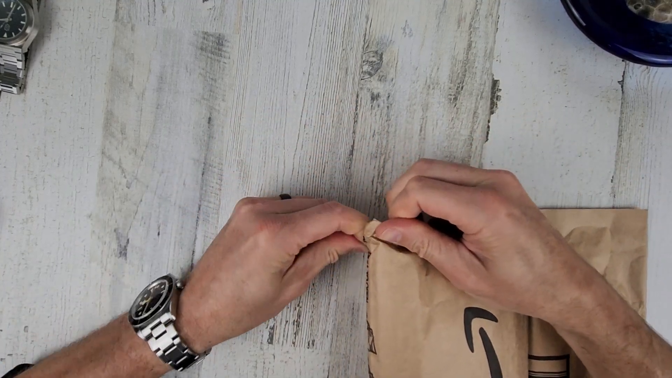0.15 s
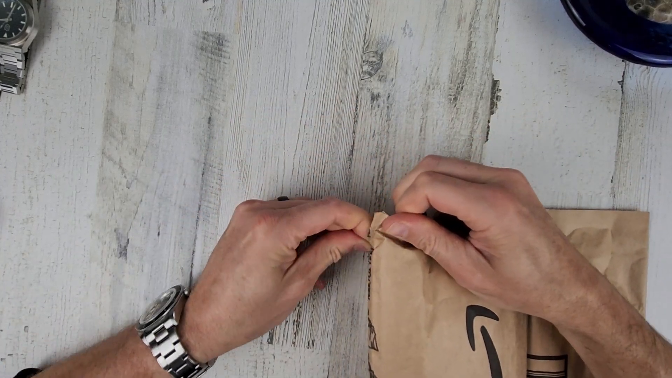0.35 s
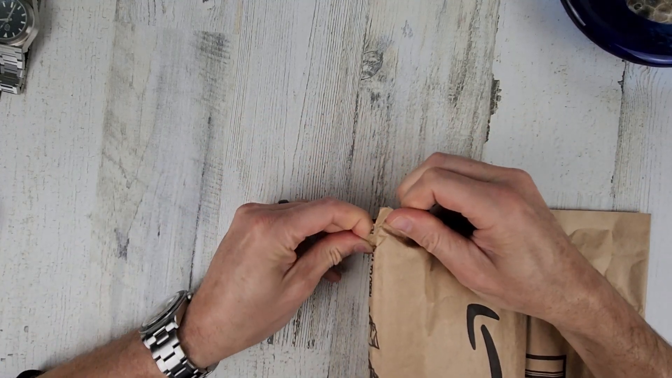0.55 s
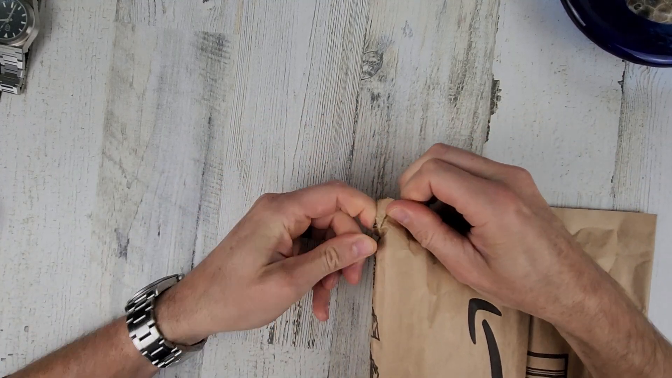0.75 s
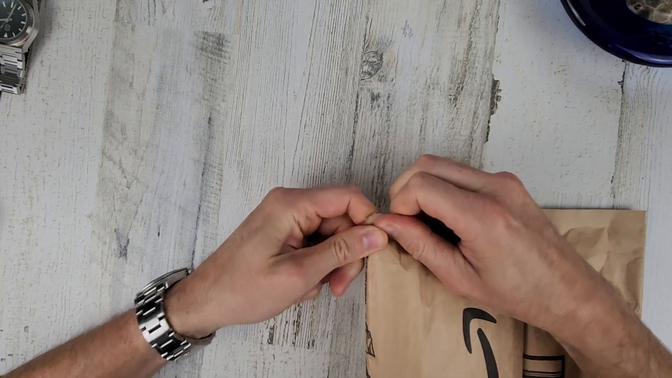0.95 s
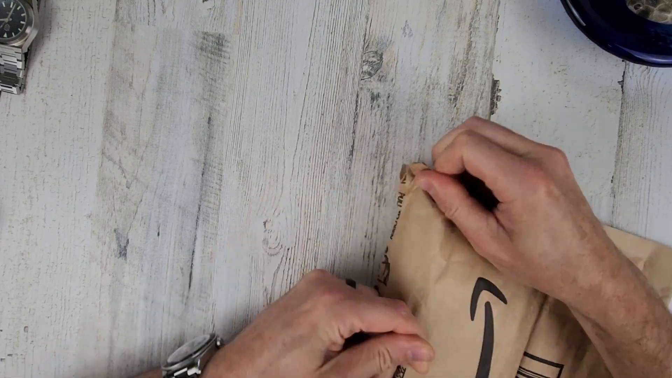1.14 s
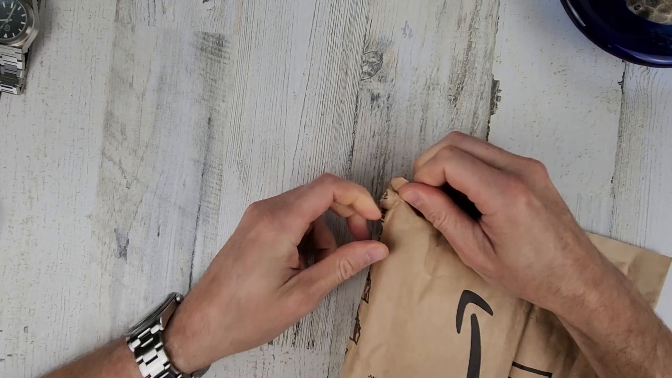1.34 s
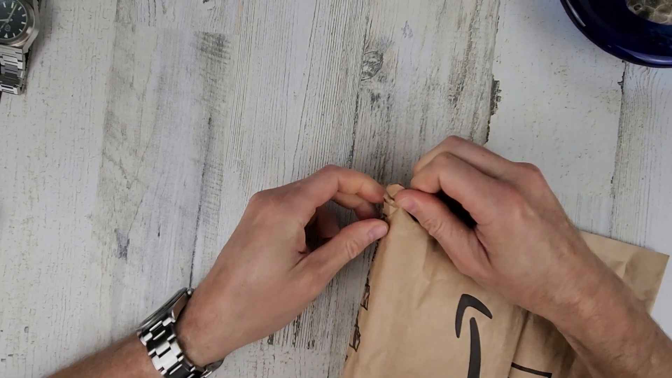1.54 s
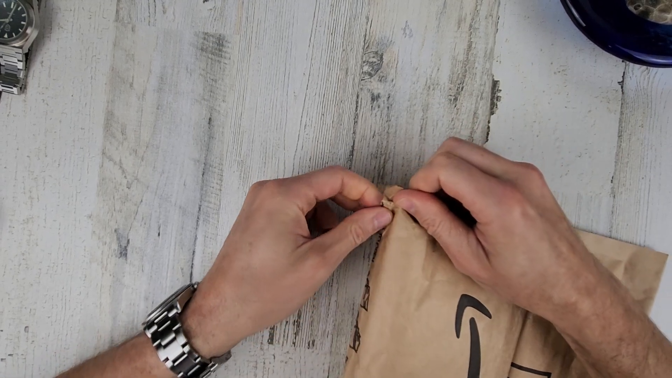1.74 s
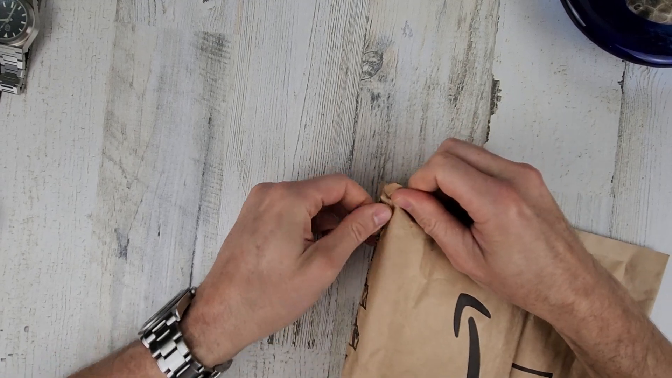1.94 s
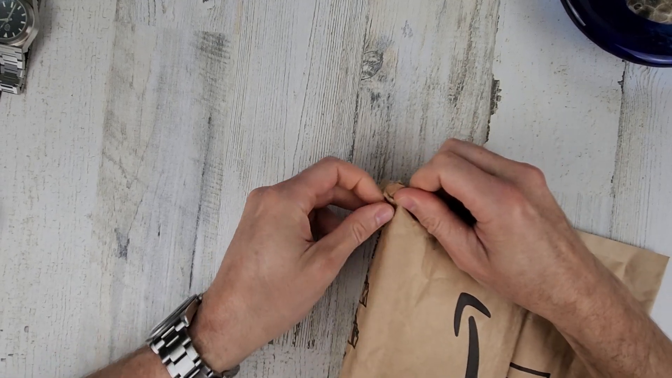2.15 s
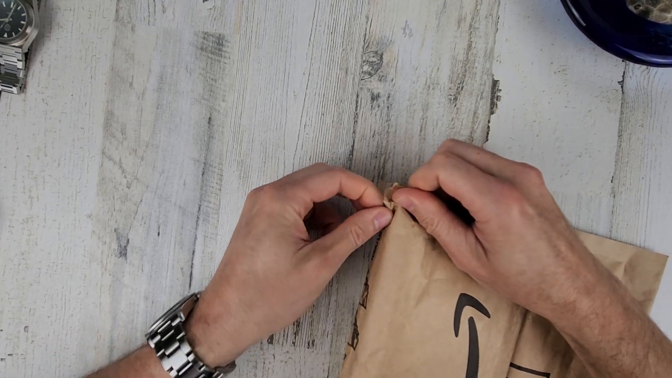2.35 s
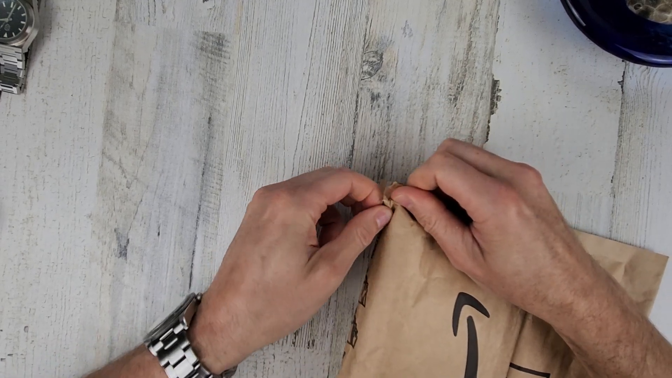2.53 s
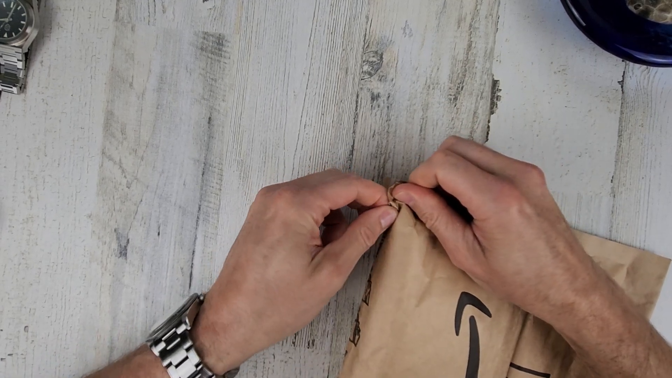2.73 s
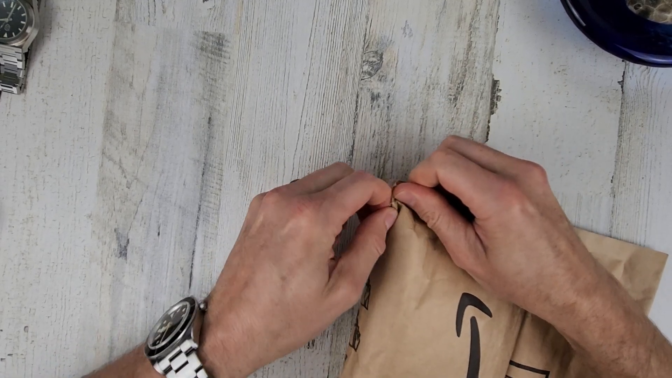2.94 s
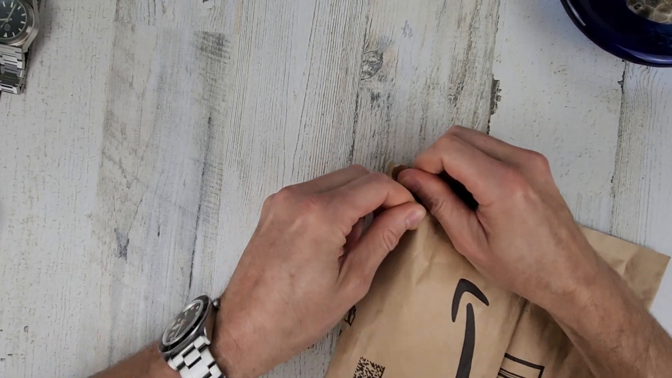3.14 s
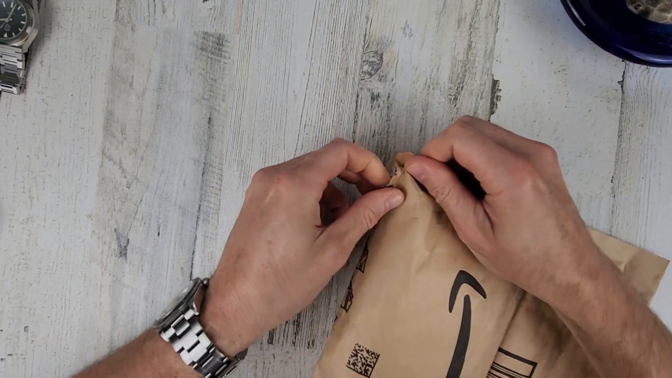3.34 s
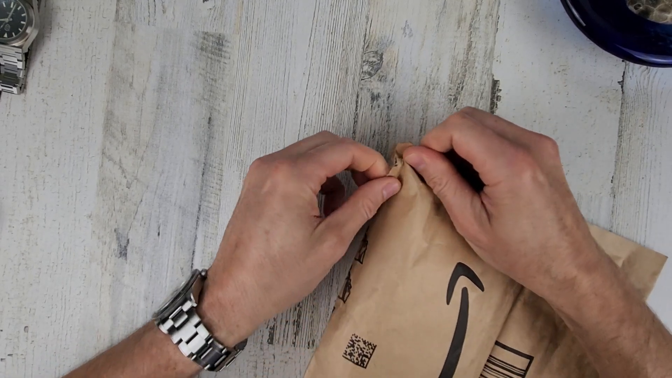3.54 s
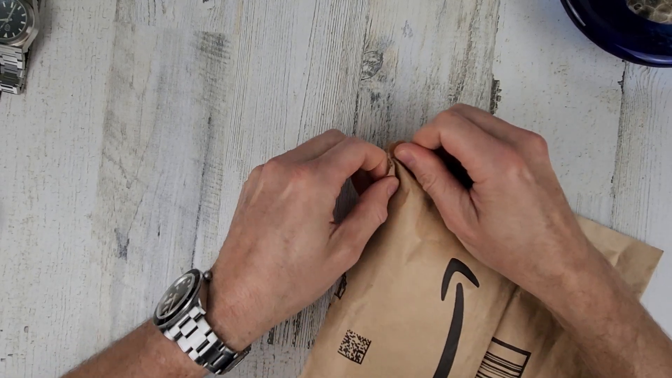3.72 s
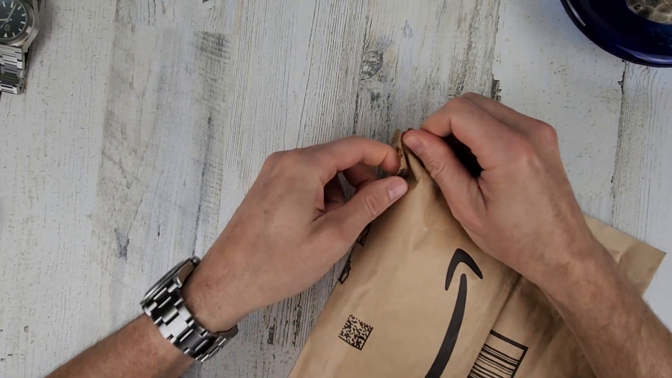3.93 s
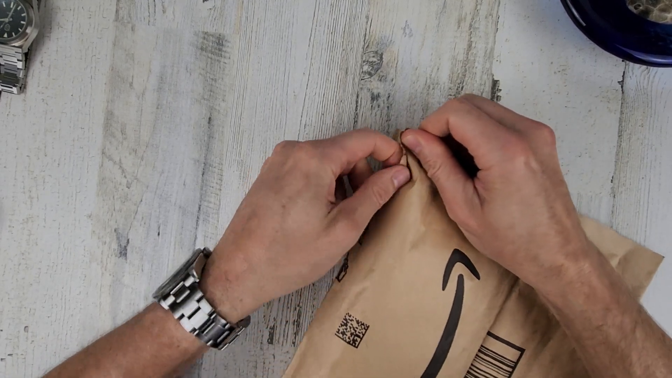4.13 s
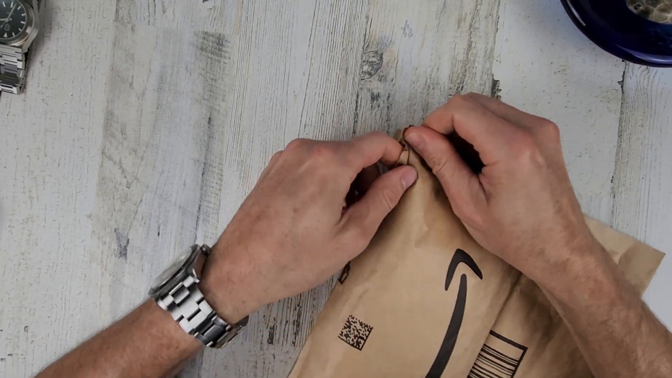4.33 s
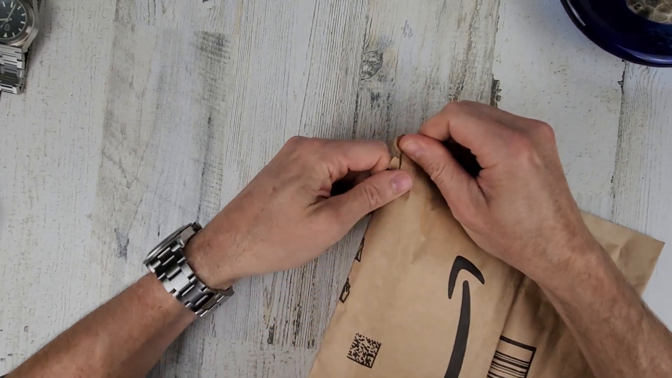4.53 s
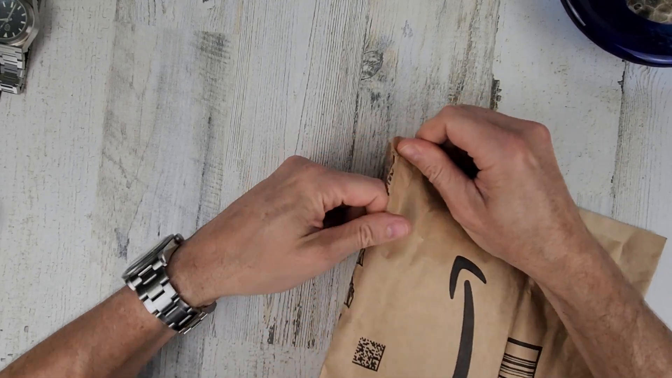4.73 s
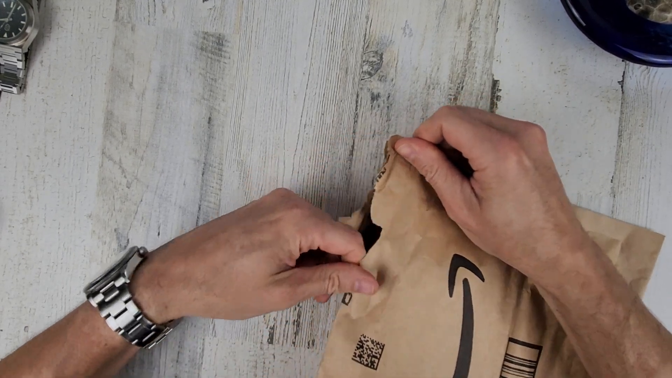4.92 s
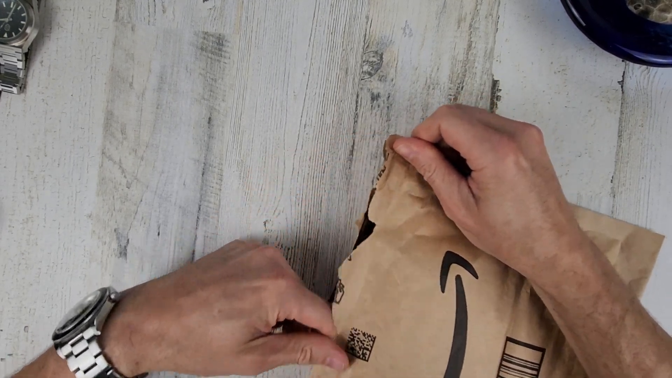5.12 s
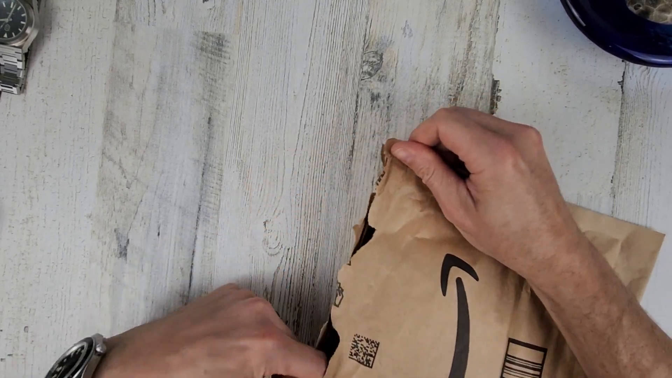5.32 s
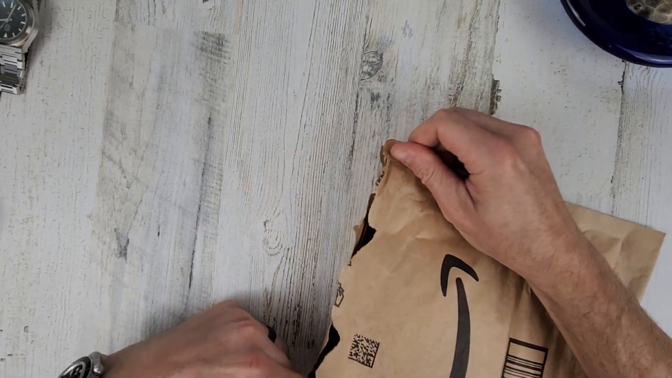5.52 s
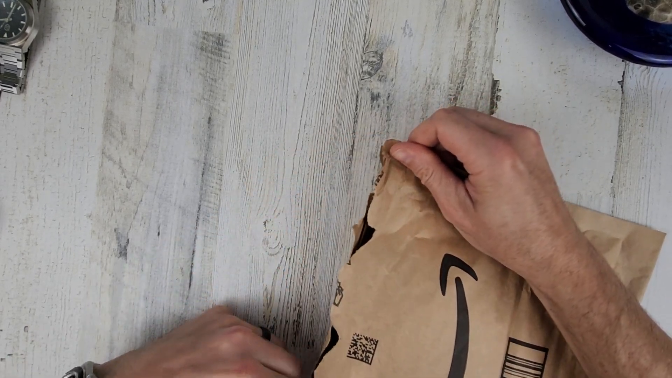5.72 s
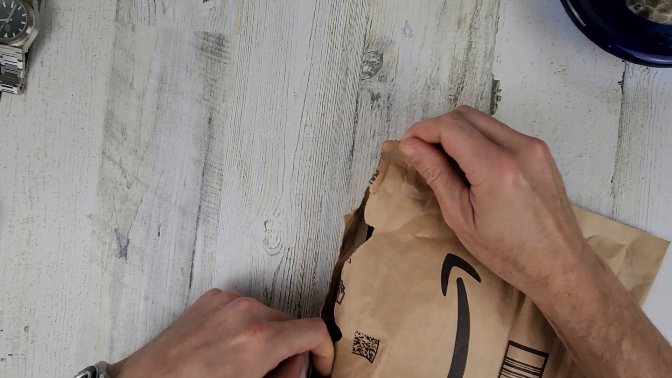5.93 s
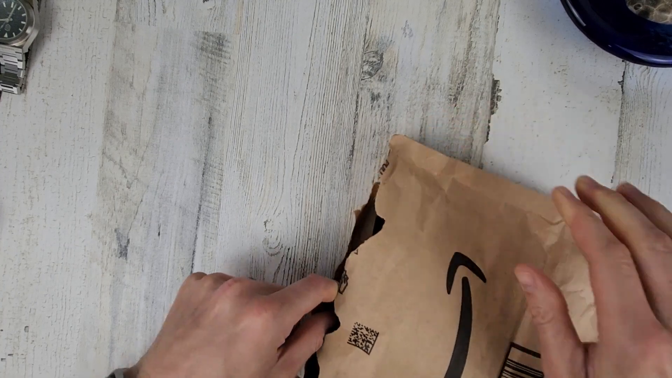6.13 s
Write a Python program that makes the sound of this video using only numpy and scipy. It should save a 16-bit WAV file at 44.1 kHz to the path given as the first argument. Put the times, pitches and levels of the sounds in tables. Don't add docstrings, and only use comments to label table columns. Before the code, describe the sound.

Close stereo microphone about half a metre above a table, with a small dry room and faint air hiss. Paper fibres whisper and crease softly, then a short, loud crackling tear breaks out. Isolated snaps and slow, creaky pulls fill the middle. A sharp crack at four and a half seconds leads into busy tearing, strip flicks and dull table knocks that thin towards the end.

```python
import sys
import numpy as np
from scipy import signal
from scipy.fft import rfft, irfft, next_fast_len
from scipy.io import wavfile
from scipy.ndimage import uniform_filter1d

SR = 44100
rng = np.random.default_rng(int(sys.argv[2]) if len(sys.argv) > 2 else 0)


def invert_db(level):
    return 10 ** (np.asarray(level, dtype=float) / 20)


def dump_mix(stems):
    frames = np.atleast_2d(stems).T
    limited = np.clip(frames, -1, 1)
    pcm = np.round(limited * 32767).astype(np.int16)
    wavfile.write(sys.argv[1], SR, pcm)


N = 272097

# pitch_hz, density_db (per Hz)
SHEET_COLOUR = [(88, -40), (170, -28), (310, -13), (438, -12), (485, -18.5), (579, -4.5), (690, -8.5),
                (1120, -3), (1370, -5.5), (2200, -6), (5000, -14), (6500, -25.5), (11000, -120)]
# pitch_hz, density_db (per Hz)
FIBRE_COLOUR = [(2060, -17), (3500, -5), (4210, -7), (5000, -2), (6300, -4.5), (7860, -3), (8900, -7),
                (10000, -9), (11200, -7.5), (12300, -4.5), (15800, -8), (16800, -9.5)]
# pitch_hz, density_db (per Hz)
TABLE_COLOUR = [(12, -50), (20, -26), (43, 1.5), (81, -2), (103, -8.5), (135, -8), (220, -14), (290, -31),
                (480, -120)]
# pitch_hz, density_db (per Hz)
ROOM_COLOUR = [(12, -27), (20, -7.5), (299, -14), (432, -18), (1190, -8.5), (1770, -14), (2410, -10),
               (2940, -29), (8570, -20), (10000, -26), (12500, -23), (15800, -27)]
# pitch_hz, likeness (0 to 1)
LIKENESS = [(40, 0.97), (130, 0.93), (300, 0.8), (700, 0.95), (1400, 0.72), (3000, 0.38), (7000, 0.11),
            (15000, 0)]
# pitch_hz, left_minus_right_db
PORT_DIFFERENCE = [(60, -1.5), (400, 2), (1300, 1.3), (3000, 0.4), (8000, -0.3), (14000, -3.5)]
# time_s, level_db
RUMBLE = [
    (0.0, -67.5),
    (0.86, -66.5),
    (1.18, -57.5),
    (2.3, -75.5),
    (4.31, -76.5),
    (5.1, -49.5),
    (5.41, -56),
    (5.6, -64),
    (6.17, -65),
]
# start_s, peak_db, pitch_hz, fade_ms
TABLE_KNOCKS = [(1.063, -30.5, 96, 43), (1.138, -35, 67.6, 39), (1.945, -53.5, 77, 98),
                (3.015, -33.5, 106, 15), (3.09, -47.5, 70.0, 22), (3.632, -55, 84.6, 23),
                (4.529, -42, 62.4, 20), (4.601, -42, 57.6, 53), (4.837, -48, 98, 25),
                (5.109, -35.5, 93, 27), (5.258, -38.5, 114, 17), (5.368, -41, 86.5, 35),
                (5.588, -43, 118, 15), (5.782, -52.5, 124, 22), (5.909, -48.5, 53.8, 44),
                (6.027, -38.5, 103, 16)]
# start_s, peak_db, pitch_hz, sharpness_db
LARGE_FOLDS = [(1.121, -15, 676, -7), (1.138, -1.5, 920, -8.5), (1.185, -11.5, 890, -20),
               (1.242, -7, 675, -4), (1.447, -13, 700, -31), (1.448, -14.5, 1257, -23.5),
               (1.963, -8.5, 580, -16), (2.017, -13.5, 1090, -15.5), (2.046, -16.5, 930, -20),
               (2.087, -17, 934, -28), (3.086, -15, 1060, -15.5), (3.091, -17, 900, -20),
               (3.34, -11.5, 1220, -9.5), (3.639, -6, 1000, -16), (4.389, -19, 1610, -12.5),
               (4.4265, -2, 1480, -5), (4.556, -18, 1030, -7.5), (4.587, -13.5, 930, -9),
               (4.602, -13, 890, -4), (4.62, -12, 1000, -6), (4.639, -22, 1150, -11.5),
               (4.674, -14.5, 1300, -21), (4.933, -16, 1160, -18), (5.053, -15, 920, -14),
               (5.103, -6, 1050, -12), (5.124, -3.5, 1060, -19), (5.136, -13, 1050, -22),
               (5.153, -8, 880, -24), (5.259, -17.5, 1260, 2.5), (5.3245, -3.5, 1040, -5.5),
               (5.362, -3, 1106, -26), (5.464, -13, 1140, -11), (5.6345, -15, 1550, -18),
               (5.966, -13.5, 1254, -12)]
# start_s, peak_db, pitch_hz
SMALL_CREASES = [(0.275, -29, 1220), (0.29, -26.5, 1240), (0.504, -37, 445), (0.529, -29.5, 1360),
                 (0.645, -28, 1090), (0.665, -23, 1330), (0.701, -31, 1640), (1.082, -20, 1030),
                 (1.22, -17.5, 1420), (1.368, -28.5, 1100), (1.918, -37, 1160), (2.568, -31.5, 1230),
                 (2.637, -29.5, 1280), (3.016, -22, 573), (3.058, -32, 740), (3.264, -25, 1030),
                 (3.752, -41, 820), (3.816, -34.5, 760), (3.846, -31.5, 1030), (3.959, -27, 1053),
                 (4.186, -21.5, 900), (4.516, -22, 1000), (4.874, -18, 1030), (5.016, -29, 1540),
                 (5.223, -19, 1190), (5.507, -21, 1120), (5.532, -19.5, 1090), (5.594, -24, 1150),
                 (5.608, -18.5, 1060), (5.896, -15.5, 1185), (4.772, -27, 1500), (4.638, -20, 1000),
                 (1.954, -26, 1400), (2.022, -22, 2000), (2.03, -30, 1500), (0.655, -32, 2000),
                 (3.655, -30, 1300), (1.06, -20, 600), (1.13, -17, 760), (3.097, -24, 1300),
                 (3.124, -30, 1700), (4.851, -15, 1500), (4.952, -20, 1300), (5.018, -19, 895),
                 (5.062, -23, 1000), (5.166, -19, 1010), (5.404, -27, 1500), (5.44, -21, 1000),
                 (5.484, -25, 1200)]
# start_s, peak_db
STRIP_FLICKS = [(0.79, -21.5), (0.958, -25.5), (1.15, -8.5), (1.396, -30), (2.101, -14), (2.998, -25),
                (3.006, -26), (4.323, -29), (4.663, -22), (4.772, -29), (4.789, -19.5), (4.807, -19.5),
                (4.84, -10), (4.891, -12.5), (4.908, -8.5), (4.973, -9), (4.998, -11), (5.331, -33),
                (5.786, -18.5), (4.8745, -16), (4.986, -15), (5.012, -16), (5.938, -17), (6.019, -8.5),
                (5.951, -14.5), (1.242, -13), (1.129, -14), (4.8, -33)]
# start_s, hiss_db, sheet_over_hiss_db, fall_ms
RIPS = [(0.49, -52.5, -8, 43), (0.558, -40.5, -7, 22), (1.066, -18.5, -3, 6), (1.084, -25.5, 0, 22.5),
        (1.609, -51, 2.5, 70), (1.671, -47, 4.5, 19), (2.641, -45.5, 0, 18), (3.346, -48.5, 7.5, 41),
        (3.643, -45.5, 6, 38.5), (4.522, -30, -2.5, 12), (4.652, -29, 3, 30), (4.842, -21, 5, 23.6),
        (4.868, -26.5, 1, 70), (4.914, -23.5, -0.5, 24), (5.105, -24, 3, 51), (5.127, -22, 4, 14),
        (5.22, -37, -1, 25), (5.242, -29.5, -0.5, 44), (5.288, -31, -1.5, 27), (5.366, -22.5, -1, 20.6),
        (5.466, -27.5, -5, 32.5), (5.633, -33, 1, 18.7), (6.017, -28, 1, 24.3)]
# release_s, hiss_db, sheet_over_hiss_db, rise_ms
SLOW_PULLS = [(0.031, -53, -7.5, 34), (0.626, -55.5, 3.5, 21), (0.985, -42.5, 1, 67), (1.148, -30, 3.5, 36),
              (1.377, -57.5, 8.5, 120), (1.488, -44, 7, 27), (1.808, -52.5, 2, 46), (1.979, -36, 0.5, 39),
              (2.003, -51.5, 5.5, 95), (2.103, -37, 3, 71), (2.332, -48.5, -1, 44), (2.615, -48, 3, 52),
              (2.692, -58, -6, 33), (2.972, -49, -1, 36), (3.026, -30.5, -1.5, 24), (3.121, -41, 4, 100),
              (3.242, -44.5, -6, 107), (3.908, -53, 3.5, 50), (4.194, -35.5, -3.5, 42),
              (4.221, -54.5, 5, 120), (4.285, -46, 0, 92), (4.361, -48, 2.5, 46), (4.976, -23.5, 1, 25),
              (5.02, -23.5, 2, 58), (5.167, -28, 0.5, 58), (5.452, -29.5, -2, 33.6),
              (5.607, -32, 2.5, 27.4), (5.914, -39, 3.5, 82)]
# peak_s, hiss_db, sheet_over_hiss_db, fall_ms
FINGER_RUBS = [(0.066, -57.5, 0.5, 53), (0.173, -49, 0, 56), (0.282, -50.5, -1, 53), (0.419, -52, -8.5, 73),
               (0.68, -49.5, 3.5, 83), (0.766, -52, -2, 22), (0.796, -44, 4.5, 18), (0.851, -48, 0, 115),
               (1.045, -39.5, -4, 55), (1.178, -33.5, 4.5, 37), (1.24, -41.5, -1.5, 100),
               (1.533, -55, 3, 47), (1.586, -47.5, -6.5, 44), (1.912, -52, 0, 26), (2.16, -44.5, -0.5, 59),
               (2.377, -57.5, 2.5, 50), (2.48, -61.5, 2.5, 69), (2.757, -57.5, 3, 37),
               (3.281, -48.5, 1.5, 138), (3.519, -64.5, 10.5, 32), (3.613, -61.5, 10.5, 32),
               (3.795, -51.5, 3.5, 118), (4.054, -46, -2, 58), (4.408, -36.5, 2.5, 53),
               (4.547, -39.5, 2.5, 77), (4.616, -19, 1, 26), (4.783, -45.5, 8.5, 100),
               (5.068, -35.5, 0, 31), (5.557, -44, -3, 115), (5.96, -38, 2.5, 90), (6.12, -55.5, -13, 66)]
# start_s, hiss_db, sheet_over_hiss_db, fall_ms
GLUE_SPOTS = [(0.531, -37, -2, 19.5), (1.0615, -21, 0, 6.8), (1.2432, -26, -4.5, 13), (2.837, -56, -14, 18),
              (2.871, -52.5, -3, 50), (4.325, -36, -6, 6), (4.4285, -27, 2, 10.4), (5.327, -28, 0.5, 24),
              (5.788, -36.5, 1, 21), (5.511, -36, 3, 7), (1.451, -52, 14, 9.8), (3.751, -55, 4, 40),
              (4.959, -30, 0, 12), (5.123, -30, 0, 10), (3.342, -36, 6, 9), (3.64, -36, 6, 11),
              (5.3315, -27, 0, 3), (6.018, -28, 0, 8), (5.556, -39, -8, 12), (3.366, -48, -3, 6),
              (4.407, -36, -2, 5), (1.369, -48.5, 5, 8), (4.557, -36, 0, 5), (5.233, -36, -2, 8),
              (0.791, -43, -2, 8)]
# start_s, end_s, pitch_hz, level_over_sheet_db
TAUT_PANELS = [
    (4.824, 5.034, 2200, -4),
    (5.122, 5.18, 940, 0),
    (5.416, 5.497, 1086, -1),
    (5.85, 5.93, 1143, 0.5),
    (2.13, 2.8, 1255, -3),
    (3.38, 3.696, 1110, -3.5),
    (4.58, 4.676, 894, -5),
]
# start_s, peak_db, pitch_hz
THREADS = [(0.401, -42, 5160), (0.4888, -40, 8870), (0.5295, -24, 7870), (0.7901, -23, 4690),
           (1.0615, -9, 5040), (1.1388, -10, 3560), (1.1514, -19, 2550), (1.2428, -8.5, 2700),
           (1.5673, -41, 6480), (1.6651, -38, 5430), (1.9624, -16, 5000), (2.0214, -27, 3240),
           (2.1022, -19, 3170), (2.5864, -39, 3010), (2.637, -31, 6590), (2.8345, -50, 7490),
           (2.8698, -34, 7500), (2.9612, -39, 4940), (3, -24, 4390), (3.0155, -21, 7800),
           (3.3413, -16.5, 3350), (3.6386, -20, 3790), (4.0587, -29, 5370), (4.1699, -25, 6360),
           (4.3231, -26, 4680), (4.4074, -25, 3410), (4.4276, -6.5, 5260), (4.5184, -20, 5050),
           (4.5565, -22, 6940), (4.6033, -8, 2860), (4.8393, -9, 2790), (4.8743, -17, 2540),
           (4.9067, -13, 6410), (4.9596, -14, 4720), (4.9926, -11, 3000), (5.1013, -15, 2630),
           (5.114, -9, 6350), (5.124, -8, 3820), (5.2324, -21, 3330), (5.24, -20, 2950),
           (5.2594, -18.5, 5110), (5.2947, -26, 2530), (5.3258, -6, 7740), (5.3632, -9, 7720),
           (5.4301, -22, 5220), (5.464, -16, 7340), (5.5563, -31, 7330), (5.5837, -27, 3080),
           (5.5957, -21, 3290), (5.6356, -18, 5390), (5.7871, -24.5, 3240), (6.018, -12, 2840)]
# start_s, end_s, pitch_hz, level_over_hiss_db
RINGING_EDGES = [(1.06, 1.077, 3300, -3), (1.243, 1.262, 2750, -1), (1.463, 1.495, 5300, -3),
                 (2.04, 2.115, 7600, -4), (3.005, 3.037, 7800, -3.5), (3.09, 3.249, 5040, -6),
                 (3.09, 3.15, 7900, -5), (3.2, 3.275, 12500, -3.5), (4.15, 4.308, 5470, -4),
                 (4.59, 4.683, 13000, -6), (4.904, 4.929, 6360, -4.5), (4.958, 5.03, 4730, -4.5),
                 (5.119, 5.14, 4000, -2), (5.09, 5.19, 13000, -4), (5.23, 5.312, 13000, -4.5),
                 (5.326, 5.345, 8000, -1), (5.361, 5.391, 7760, -3.5), (5.431, 5.487, 7900, -5.5),
                 (5.552, 5.645, 14500, -2), (5.852, 6.044, 4200, -6.5)]
# time_s, treble_db
EDGE_FACING = [(0.0, 0), (0.6, 0), (1.06, 2), (1.3, 0), (1.8, 0), (2.1, 0), (2.4, -4), (2.9, -3), (3.2, 0),
               (3.55, 1), (4.0, 0), (4.2, -4), (4.6, 0), (5.0, 0), (5.3, 1), (5.6, 1), (5.85, -2),
               (6.17, -4)]


def level(x, db=0):
    return x * invert_db(db) / np.sqrt(np.mean(x ** 2))


def along(table, size):
    hz, value = np.transpose(table)
    return np.interp(np.log(np.fft.rfftfreq(size, 1 / SR) + 1), np.log(hz + 1), value)


def over_time(table):
    return np.interp(np.arange(N) / SR, *np.transpose(table))


def colour(x, table):
    cep = irfft(np.log(invert_db(along(table, size=4096))))
    cep[1:2048] *= 2
    cep[2049:] = 0
    response = irfft(np.exp(rfft(cep)))[None, :2048]
    return signal.fftconvolve(x, response, axes=-1)[:, :N]


def pair(gate):
    size = next_fast_len(N)
    mid, side = rfft(gate * rng.standard_normal((2, N)), size)
    alike = np.clip(along(LIKENESS, size), 0, 1)
    mid = mid * np.sqrt(1 + alike)
    side = side * np.sqrt(1 - alike)
    return irfft(np.array([mid + side, mid - side]), size)[:, :N]


def walk(rate):
    k = int(SR / rate)
    targets = np.repeat(rng.standard_normal(N // k + 1), k)[:N]
    return 0.9 * uniform_filter1d(targets, k)


def breaks(per_s, spread_db, fall_s):
    when = rng.random(N) < per_s / SR
    size = invert_db(spread_db * np.minimum(rng.exponential(size=N), 3.5))
    falling = signal.lfilter([1], [1, -np.exp(-1 / (fall_s * SR))], when * size)
    return level(falling + 1e-9)


def resonate(x, hz, q):
    return signal.lfilter(*signal.iirpeak(hz, q, fs=SR), x)


def add(out, s, sound):
    i = max(int(s * SR), 0)
    out[..., i:i + sound.shape[-1]] += sound[..., :N - i]


def room(dry):
    t = np.arange(SR // 4) / SR
    fade = np.exp(-np.log(1000) * t / 0.11)
    tail = rng.standard_normal((2, len(t))) * fade * np.minimum(t / 0.001, 1)
    tail = signal.lfilter([1], [1, -.6], tail)
    tail = tail / np.sqrt(np.sum(tail[0] ** 2))
    wet = signal.fftconvolve(dry.mean(axis=0)[None], tail, axes=-1)[:, :N]
    air = level(colour(pair(1), ROOM_COLOUR), -65)
    return invert_db(-17.0) * wet + air


def rumble():
    unsteady = invert_db(2.9 * walk(16))
    return level(colour(pair(unsteady), TABLE_COLOUR)) * invert_db(over_time(RUMBLE) + 2.5)


def pulls():
    moves = [(s, db, sheet_db, 8.3, ms) for s, db, sheet_db, ms in RIPS]
    moves += [(s, db, sheet_db, 0.4, ms) for s, db, sheet_db, ms in GLUE_SPOTS]
    moves += [(s, db, sheet_db, ms, 5.3 + 0.26 * ms) for s, db, sheet_db, ms in SLOW_PULLS]
    moves += [(s, db, sheet_db, 0.66 * ms, ms) for s, db, sheet_db, ms in FINGER_RUBS]
    t, power = np.arange(0, N, 32) / SR, 0
    for s, db, sheet_db, rise_ms, fall_ms in moves:
        away_ms = np.abs(t - s) * 1000
        shape = np.exp(-np.where(t < s, (away_ms / rise_ms) ** 2, (away_ms / fall_ms) ** 1.4))
        power = power + (shape * invert_db(np.array([[db], [db + sheet_db]]))) ** 2
    return [np.interp(np.arange(N) / SR, t, np.sqrt(p)) for p in power]


def patches(x, edges_hz, depth_db, rate):
    lows = [signal.sosfilt(signal.butter(2, hz, fs=SR, output="sos"), x) for hz in edges_hz]
    lows = [0] + lows + [x]
    return [(upper - lower) * invert_db(depth_db * walk(rate)) for lower, upper in zip(lows, lows[1:])]


def crinkle():
    pitches_hz = 750 * 1.31 ** np.arange(6)
    return level(sum(level(resonate(pair(breaks(45, 4.8, 0.0012)), hz, 4.5)) for hz in pitches_hz))


def tearing():
    hiss, body = pulls()
    fine = 0.51 + 0.55 * breaks(1000, 4.8, 0.0016)
    coarse = 0.72 + 0.5 * breaks(350, 5.3, 0.002)
    fibre_noise = level(colour(pair(fine), FIBRE_COLOUR))
    *lower, upper, top = patches(fibre_noise, (3870, 5100, 6570, 8400, 10540, 13000), depth_db=3.5, rate=50)
    brightness = invert_db(over_time(EDGE_FACING)) * np.minimum(hiss / invert_db(-34.5), 1) ** 0.05
    fibres = sum(lower) + (upper + top) * brightness + edge()
    sheet_noise = level(colour(pair(coarse), SHEET_COLOUR))
    large, *small = patches(sheet_noise, (546, 870, 1510, 2920), depth_db=2.5, rate=51)
    large = large * np.minimum(body / invert_db(-47.0), 1) ** 1.2
    sheet = large + sum(small) + invert_db(-6.0) * crinkle() + strip()
    return invert_db(1.23 * walk(90)) * (fibres * hiss * invert_db(0.74) + sheet * body * invert_db(-2.5))


def creases():
    folds = LARGE_FOLDS + [(s, db, hz, -22.5) for s, db, hz in SMALL_CREASES]
    folds = folds + [(s, db, 2200, -8.5) for s, db in STRIP_FLICKS]
    return [(s, db, hz, sharp_db + 4, sharp_db - 7) for s, db, hz, sharp_db in folds]


def panel_ring(t, db, hz, small_db, rise):
    rank = np.arange(10)[:, None]
    small = rank > 4
    place, phase, gain = rng.random((3, 10, 1))
    step = (rank % 5 + place) / 5
    mode_hz = np.where(small, 2300 * 2.7 ** step, hz * 2 ** (1.37 * (step - .25)))
    mode_hz[1], gain[1] = hz, 0
    since = t - 2 * rise
    swell = np.exp(-(since / rise) ** 2)
    fade = np.exp(-np.abs(since) * mode_hz ** .9 * np.where(rank == 1, .6, 1))
    decay = np.where(since < 0, swell, fade)
    twist = np.array([1, -1])[:, None, None] * (phase - .5) * mode_hz / 2500
    size = invert_db(-9 * gain ** 0.11 + small * (small_db + 8.5) + 2.8 * (rank == 1))
    wave = np.cos(2 * np.pi * (mode_hz * since + 0.37 * (phase - .5)) + twist)
    ring = -(decay * size * wave).sum(axis=1)
    return ring / np.abs(ring.mean(axis=0)).max() * invert_db(db)


def snaps():
    t = np.arange(SR // 36) / SR
    out = np.zeros((2, N))
    cracks, rattle = np.zeros((2, N))
    for s, db, hz, small_db, crack_db in creases():
        rise = .0003 * invert_db(-0.18 * min(small_db, 0))
        ring = panel_ring(t, db, hz, small_db, rise)
        s = s + .0019 - 2 * rise
        add(out, s, ring)
        add(out, s + 0.0051, invert_db(-13.0) * ring)
        add(cracks, s + rise, invert_db(db + crack_db) * (np.exp(-t / 0.0023) + 0.13 * np.exp(-t / 0.0039)))
        add(rattle, s + 0.00125, invert_db(db - 17.5) * np.exp(-t / 0.0053))
    out = signal.sosfilt(signal.butter(3, 340, "high", fs=SR, output="sos"), out)
    out = out + cracks * level(colour(pair(1), FIBRE_COLOUR))
    return out + rattle * level(colour(pair(1), SHEET_COLOUR))


def pings():
    out, t = np.zeros((2, N)), np.arange(SR // 50) / SR
    for s, db, hz in THREADS:
        phase = 2 * np.pi * rng.random() + np.array([[1], [-1]]) * (rng.random() - .5) * hz / 2500
        swell = np.minimum(t / 0.0002, 1) * np.exp(-t * hz / 7)
        partner = 0.39 * np.sin(2 * np.pi * 1.6 * hz * t - 2 * phase)
        ring = np.sin(2 * np.pi * hz * t + phase) + partner
        add(out, s, invert_db(db - 5) * swell * ring)
    return out


def edge():
    out = np.zeros((2, N))
    grains = level(pair(0.5 + 0.67 * breaks(600, 4.0, .002)))
    for start_s, end_s, hz, db in RINGING_EDGES:
        span = slice(int(start_s * SR), int(end_s * SR))
        ring = level(resonate(grains[:, span], hz, 8.8), db)
        add(out, start_s, ring * signal.windows.tukey(ring.shape[1], .3))
    return out


def knocks():
    out, t = np.zeros((2, N)), np.arange(SR // 4) / SR
    for s, db, hz, fade_ms in TABLE_KNOCKS:
        swell = (1 - np.exp(-t / 0.0027)) * np.exp(-t * 1000 / fade_ms)
        boom = np.sin(2 * np.pi * hz * t) + 0.56 * np.sin(2 * np.pi * 0.66 * hz * t)
        add(out, s, invert_db(db + 4.0) * swell * boom)
    return out


def strip():
    t, out = np.arange(N) / SR, 0
    grains = pair(0.45 + breaks(200, 4.3, 0.0021))
    for start_s, end_s, hz, db in TAUT_PANELS:
        taut = uniform_filter1d(1. * (t > start_s) * (t < end_s), SR // 50)
        out = out + level(resonate(grains, hz, 17), db) * taut
    return out


def scene():
    paper = tearing() + snaps() + pings()
    return paper + rumble() + knocks() + room(paper)


def low_pass(x):
    return signal.sosfilt(signal.butter(12, 17000, fs=SR, output="sos"), x)


def record(dry):
    size = next_fast_len(N)
    tilt = invert_db(np.array([[.5], [-.5]]) * along(PORT_DIFFERENCE, size))
    tilt = tilt * (np.fft.rfftfreq(size, 1 / SR) < 16000)
    ports = irfft(rfft(dry, size) * tilt, size)[:, :N]
    ports[1] = np.roll(ports[1], 2)
    return low_pass(np.clip(ports, -1, 1))


dry = scene()
out = record(dry)
dump_mix(out)
```